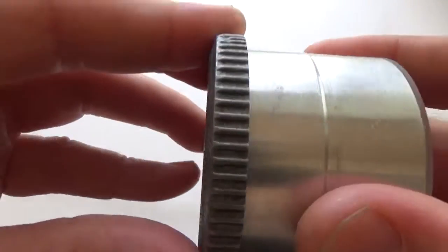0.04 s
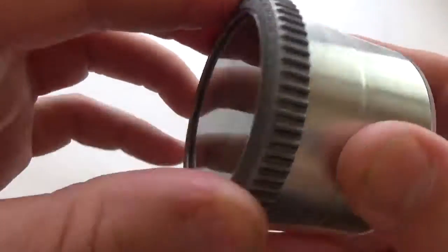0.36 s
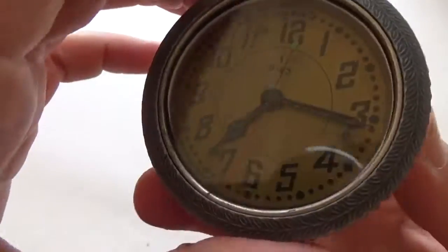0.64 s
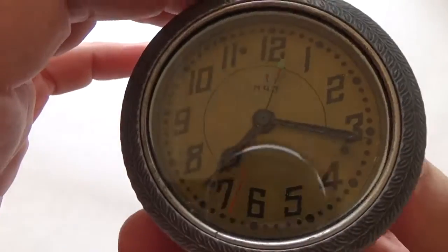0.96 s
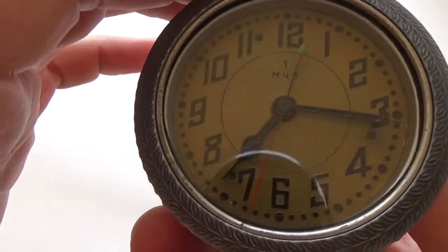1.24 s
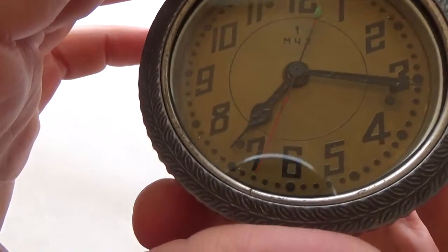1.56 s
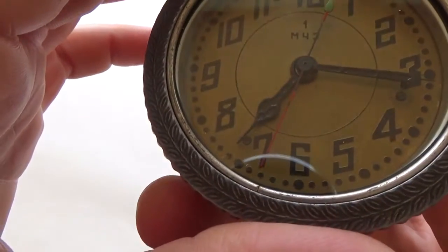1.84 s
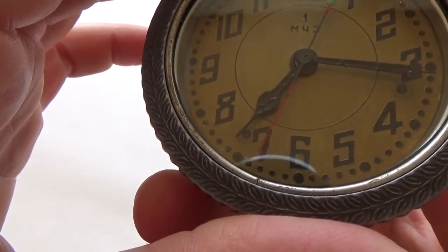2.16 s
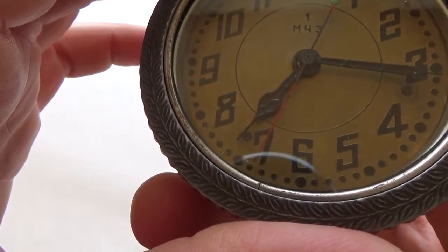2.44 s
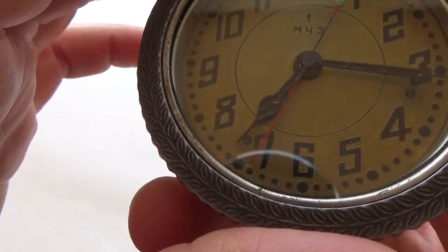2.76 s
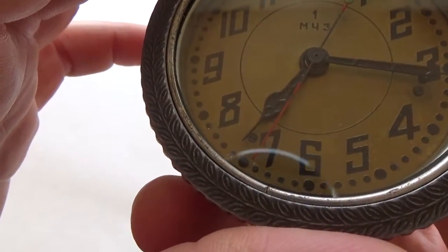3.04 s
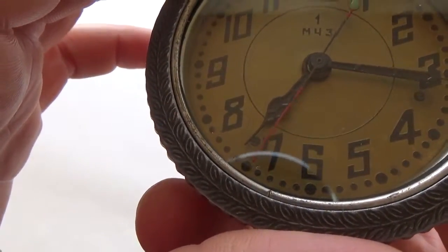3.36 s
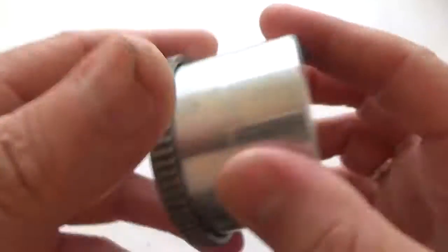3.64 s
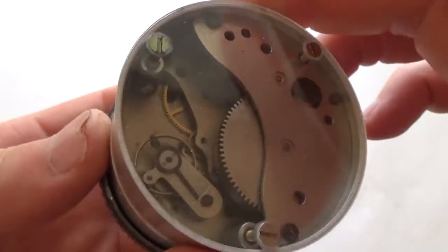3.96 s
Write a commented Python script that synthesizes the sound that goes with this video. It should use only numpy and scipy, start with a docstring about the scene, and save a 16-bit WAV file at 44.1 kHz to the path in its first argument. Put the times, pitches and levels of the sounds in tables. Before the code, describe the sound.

Quick metallic ticking of a handheld clock, with an opening snap and faint handling clicks.

```python
"""A small mechanical desk clock, turned in the hands close to the microphone in a quiet room.
Over a low hum and room noise, a loud double snap comes first and rings in the room. Then the escapement
beats five times a second, tick and tock, each beat three contacts that ring the metal case. Fingers rub
and click on the case, and a very faint high flutter joins at about one second. Past halfway the hum
drops away; near the end a loose part clinks as the clock is turned over."""
import sys
import numpy as np
from scipy import signal
from scipy.fft import rfft, irfft, next_fast_len
from scipy.io import wavfile
from scipy.ndimage import map_coordinates

SR = 44100
rng = np.random.default_rng(int(sys.argv[2]) if len(sys.argv) > 2 else 0)


def output_pcm(signal):
    """Save a mono or channel-first signal as 16-bit PCM at the path in sys.argv[1].

    Samples are clipped to [-1, 1] before scaling.
    """
    pcm = np.clip(np.atleast_2d(signal).T, -1, 1) * 32767
    wavfile.write(sys.argv[1], SR, np.round(pcm).astype(np.int16))


N = 176400


def amp(db):
    """Decibels to gain."""
    return 10 ** (np.asarray(db) / 20)


def unit(x):
    """Scale to rms 1."""
    return x / np.sqrt(np.mean(x ** 2) + 1e-20)


def fade(t, t60):
    """Exponential decay, 60 dB down after t60 seconds."""
    return np.exp(-np.log(1000) * t / t60)


def along(points, hz):
    """Read (Hz, value) points on a log frequency axis."""
    freqs, values = np.transpose(points)
    return np.interp(np.log(hz + 1), np.log(freqs + 1), values)


def level(points):
    """Turn (seconds, dB) points into a gain per sample."""
    return amp(np.interp(np.arange(N) / SR, *np.transpose(points)))


def wobble(rate):
    """A smooth random curve, rate knots a second."""
    knots = rng.standard_normal(int(N * rate / SR) + 4)
    return map_coordinates(knots, [np.arange(N) * rate / SR])


def add(track, start, sound):
    """Mix a sound in at start seconds."""
    part = track[max(round(start * SR), 0):][:len(sound)]
    part += sound[:len(part)]


def colour(x, spectrum):
    """Filter by (Hz, dB) points."""
    n = x.shape[-1]
    return irfft(rfft(x) * amp(along(spectrum, np.fft.rfftfreq(n, 1 / SR))), n)


def spread(pair, width):
    """Two unrelated signals, as mid and side, make left and right."""
    side = colour(pair[1], width)
    return np.array([pair[0] + side, pair[0] - side])


def noise(spectrum, width):
    """Coloured stereo noise of rms 1."""
    return unit(spread(colour(rng.standard_normal((2, N)), spectrum), width))


def burst(spectrum, t60, low_cut_hz=140):
    """A coloured crack without deep bass that starts near rms 1 and dies away."""
    envelope = fade(np.arange(SR // 10) / SR, t60)
    crack = envelope * colour(rng.standard_normal(len(envelope)), spectrum)
    low_cut = signal.butter(2, low_cut_hz, "high", fs=SR, output="sos")
    return unit(signal.sosfilt(low_cut, crack)) * np.sqrt(np.mean(envelope ** 2))


def ring(hz, db, t60, size=SR // 10, scatter_db=2):
    """Struck modes that start near rms 1, their balance a little different at every blow."""
    t = np.arange(size) / SR
    gain = amp(db + scatter_db * rng.standard_normal(len(hz)))
    phase = rng.random((len(hz), 1))
    waves = np.sin(2 * np.pi * (hz[:, None] * t + phase)) * fade(t, t60[:, None])
    return gain / np.linalg.norm(gain) @ waves * np.sqrt(2)


# The room's hum, rumble and hiss. Each row: frequency in Hz, relative level in dB.
HUM_PARTIALS = [(59.3, -1.5), (89, -17.5), (118.6, -14), (178, -13.5), (268, -12), (473, -17)]
RUMBLE_SPECTRUM = [(20, -15), (35, -13.5), (55, -4), (80, -9), (135, 3), (180, 0), (220, -9.5), (275, 0),
                   (340, -11.5), (450, -16), (800, -47.5)]
HISS_SPECTRUM = [(180, -31), (300, -4), (656, -11), (961, -9), (1100, -14), (1340, -10), (2250, -18),
                 (3240, -16), (4370, -22), (12900, -25.5), (16000, -29)]
# How each rises and falls at the microphone. Each row: time in seconds, level in dB.
HUM_LEVEL = [(0, -69), (.3, -73.5), (.45, -64.5), (.68, -69), (.85, -82), (1.0, -65.5), (1.7, -70),
             (2.4, -71.5), (2.53, -80.5), (4, -86)]
RUMBLE_LEVEL = [(0, -72.5), (2.3, -73.5), (2.8, -73.5), (3.25, -76), (3.45, -69.5), (3.65, -76),
                (3.83, -69), (4, -73.5)]
HISS_LEVEL = [(0, -72.5), (.8, -72), (1.1, -72.5), (2.4, -73), (2.7, -74), (4, -73.5)]
# Stereo width of rumble and hiss. Each row: frequency in Hz, side over mid in dB.
ROOM_TONE_WIDTH = [(60, -21.5), (150, -19.5), (400, -6.5), (950, -0.5), (2400, 0), (6000, -6),
                   (12000, -13.5)]


def room_tone(hum_drift_s=0.00055, rumble_waver_db=1.47):
    """The quiet room behind the clock: a wavering low hum that drops away, over rumble and hiss."""
    t = np.arange(N) / SR
    hum = np.zeros(N)
    for hz, db in HUM_PARTIALS:
        hum += amp(db) * np.sqrt(2) * np.sin(2 * np.pi * hz * (t + hum_drift_s * wobble(rate=4)))
    waver = amp(rumble_waver_db * wobble(rate=6.2))
    rumble = level(RUMBLE_LEVEL) * waver * noise(RUMBLE_SPECTRUM, ROOM_TONE_WIDTH)
    hiss = level(HISS_LEVEL) * noise(HISS_SPECTRUM, ROOM_TONE_WIDTH)
    return level(HUM_LEVEL) * hum + rumble + hiss


# The pips of one flutter cycle. Each row: delay in seconds, pitch in Hz, level in dB.
FLUTTER_PIPS = [(.007, 3280, -72.5), (.006, 2680, -72), (.030, 1400, -110.5)]


def flutter(span_s=(.92, 3.96), period_s=.04, detune=0.037, scatter_db=0.5):
    """Very faint high pips in a fast, even cycle, centred behind the clock."""
    out, t = np.zeros(N), np.arange(SR // 10) / SR
    for start in np.arange(*span_s, period_s):
        for delay, hz, db in FLUTTER_PIPS:
            pitch = hz * (1 + detune * rng.standard_normal())
            gain = amp(db + scatter_db * rng.standard_normal())
            add(out, start + delay, gain * np.sin(2 * np.pi * pitch * t) * fade(t, t60=0.035))
    return out


# Sound scattered into the room. Each row: frequency in Hz, gain in dB.
SCATTER_SPECTRUM = [(500, -17), (3000, -7), (4800, -5.5), (6500, 4), (8000, 5.5), (9500, 4.5), (11000, 1),
                    (13000, -10.5), (16000, -15.5)]
# How long the room rings. Each row: frequency in Hz, t60 in seconds.
ROOM_DECAY = [(200, 0.22), (3000, 0.304), (8500, 0.24), (12000, .2), (16000, 0.07)]
# Stereo width of echoes, rubbing and the swell. Each row: frequency in Hz, side over mid in dB.
DIFFUSE_WIDTH = [(60, -24), (150, -20.5), (400, -7.5), (1000, -9), (2400, -6.5), (6000, -7.5),
                 (12000, -17.5)]


def room_reverb(clock, positions=20):
    """The room returns the clock's clicks as a diffuse tail that changes as the clock moves."""
    out = np.zeros((2, N))
    # Multiplying by noise keeps the clicks' timing and smears away their pitch.
    scattered = colour(clock * rng.standard_normal(N), SCATTER_SPECTRUM)
    for piece in np.array_split(np.arange(N), positions):
        hz, t, bands = signal.stft(rng.standard_normal((2, SR // 2)), SR, nperseg=256)
        _, tails = signal.istft(bands * fade(t, along(ROOM_DECAY, hz)[:, None]), SR)
        for channel, response in zip(out, spread(tails, DIFFUSE_WIDTH)):
            echo = signal.fftconvolve(scattered[piece], response / np.linalg.norm(response))
            add(channel, piece[0] / SR, echo)
    return out


# Skin sliding on the case. Each row: time in seconds, level in dB.
RUB_LEVEL = [(0, -76.5), (.3, -80), (.38, -83), (.44, -86), (.462, -67), (.48, -80), (.51, -71),
             (.6, -75.5), (.7, -77.5), (.76, -84), (3.4, -84.5), (3.5, -78.5), (3.7, -78.5), (3.76, -77),
             (4, -82)]
# The colour of that friction. Each row: frequency in Hz, relative level in dB.
RUB_SPECTRUM = [(300, -8), (1200, -4.5), (4000, -3.5), (9000, -0.5), (12000, -7), (16000, -18.5)]


def finger_rub():
    """Skin rubs on metal close to the microphone: a soft hiss that swells and sinks."""
    return level(RUB_LEVEL) * noise(RUB_SPECTRUM, DIFFUSE_WIDTH)


# Touches on the case. Each row: start in seconds, then levels of click, thud and rim ring in dB.
TOUCHES = [(.4895, -51, -60, -61.5), (3.8575, -75, -59.5, -55), (3.9130, -68, -57.5, -84)]
# Bright click and low thud of a touch or a snap. Each row: frequency in Hz, relative level in dB.
CLICK_SPECTRUM = [(1000, -26), (4500, -16), (6500, -8.5), (8700, 5), (10500, -5), (12500, -13.5),
                  (16000, -29.5)]
THUD_SPECTRUM = [(30, -20), (90, -7.5), (150, -5.5), (230, 1.5), (310, -5), (400, -1), (550, 0), (680, -11),
                 (800, -4), (1000, -7), (1250, 1), (1550, -8), (2300, -11), (3400, -5.5), (4500, -18),
                 (9000, -29)]
# Modes of the rim. Each row: frequency in Hz, relative level in dB, t60 in seconds.
RIM_MODES = [(1210, 1.5, 0.066), (3200, 0.5, 0.016), (4450, 8.5, .022), (7251, -18, .05)]


def finger_clicks(t60=0.01):
    """Fingers knock lightly on the case and ring its rim as the grip changes."""
    out = np.zeros(N)
    for start, click_db, thud_db, rim_db in TOUCHES:
        click = amp(click_db) * burst(CLICK_SPECTRUM, t60)
        thud = amp(thud_db) * burst(THUD_SPECTRUM, t60)
        rim = amp(rim_db) * ring(*np.transpose(RIM_MODES))
        add(out, start, click + thud + rim)
    return out


# Clinks of a loose metal part. Each row: start in seconds, level in dB.
CLINKS = [(3.7324, -42), (3.7388, -48.5), (3.7427, -53), (3.7452, -54), (3.9850, -56.5)]
# Its modes. Each row: frequency in Hz, relative level in dB, t60 in seconds.
LOOSE_PART_MODES = [(2800, -9.5, 0.019), (4050, -14.5, 0.025), (8170, -2, 0.012), (9200, -4, 0.01),
                    (10160, -1, 0.0085), (11100, -1, 0.0065), (12600, -4.5, 0.0066)]
# Its rough contact. Each row: frequency in Hz, relative level in dB.
GRATE_SPECTRUM = [(500, -11.5), (2700, 3), (6000, -8), (10000, 0.5), (16000, -18)]


def rattle(grate_db=-16):
    """A loose part rings and grates as the clock is turned over at the microphone."""
    out = np.zeros(N)
    for start, db in CLINKS:
        clink = ring(*np.transpose(LOOSE_PART_MODES))
        grate = amp(grate_db) * burst(GRATE_SPECTRUM, t60=0.015)
        add(out, start, amp(db) * (clink + grate))
    return out


# Blows of the opening snap. Each row: start in seconds, click level in dB, thud level in dB.
SNAP_BLOWS = [(0.0398, -14.5, -20), (0.0443, -8.5, -25.5), (0.0453, -20.5, -17), (0.049, -30.5, -22.5)]
# The hollow ring under them. Each row: frequency in Hz, relative level in dB, t60 in seconds.
HOLLOW_MODES = [(131, -16, 0.53), (208, -8.5, .25), (255, -3.5, .29), (402, -7, .27), (471, -5, 0.12),
                (538, -2.5, .22), (567, -3.5, .27), (790, -0.5, .24), (907, -6, .21), (987, -11.5, .28),
                (1188, -3, .21), (1204, -3, .2), (1647, -8.5, 0.35), (2256, -12, .22), (3556, -7.5, 0.08)]
# Colour of the swell and of the room's answer. Each row: frequency in Hz, relative level in dB.
SWELL_ECHO_SPECTRUM = [(30, -31.5), (130, -10), (260, -10), (560, -5), (670, -21), (800, -10.5),
                       (1200, -10.5), (1500, -15.5), (2000, -14.5), (3300, -12), (4800, -19), (7000, -13.5),
                       (9450, -11.5), (12000, -24), (14500, -34), (16000, -54.5)]


def snap(side_db=-13.5, pan_db=0.1, hollow_db=-31):
    """A brief rising hiss swells into a cluster of hard blows; a hollow ring and the room carry on."""
    swell_db, rise_db_per_s = -34.5, 1098.5
    echo_db, hold_s, sag_db_per_s = -34, .045, 68
    mid, side = np.zeros((2, N))
    for start, click_db, thud_db in SNAP_BLOWS:
        for track, db in ((mid, 0), (side, side_db)):
            click = amp(db + click_db) * burst(CLICK_SPECTRUM, t60=.007)
            thud = amp(db + thud_db) * burst(THUD_SPECTRUM, t60=.012)
            add(track, start, click + thud)
    onset = SNAP_BLOWS[0][0]
    add(mid, onset, amp(hollow_db) * ring(*np.transpose(HOLLOW_MODES), size=SR // 2))
    direct = np.array([mid + side, mid - side]) * amp([[pan_db], [-pan_db]])
    age = np.arange(N) / SR - onset
    swell = (age < 0) * amp(swell_db - rise_db_per_s * np.abs(age))
    # The echo holds almost level for a moment, then dies away.
    echo = (age >= 0) * amp(echo_db - sag_db_per_s * np.clip(age, 0, hold_s))
    echo *= fade(np.maximum(age - hold_s, 0), t60=0.28)
    return direct + (swell + echo) * noise(SWELL_ECHO_SPECTRUM, DIFFUSE_WIDTH)


# Ticks and tocks in turn. Each row: start in seconds, relative level in dB, lift of the high ring in dB.
BEATS = [(.2349, -39, 11), (.4297, -45.5, 15.5), (.6313, -42, 25.5), (.8279, -44.5, 5.5), (1.0318, -42, 4),
         (1.2292, -43, -0.5), (1.4319, -41, -0.5), (1.6283, -41.5, -4), (1.8311, -40.5, 0),
         (2.0277, -42, -6.5), (2.2302, -40, -3), (2.4261, -42, -1), (2.6295, -40, -4.5),
         (2.8250, -41, -1.5), (3.0285, -41, -0.5), (3.2240, -43.5, -0.5), (3.4269, -38.5, -1.5),
         (3.6236, -45, -5.5), (3.8250, -35.5, 8)]
# The contacts of one beat: unlocking, impulse, drop. Each row: lead on a tick and on a tock in seconds,
# relative level in dB, further lift of the high ring in dB.
CONTACTS = [(0.033, 0.022, -21.5, 5), (.0147, .0132, -18.5, -7), (0, 0.00067, 0, 0)]
# Modes of the metal case. Each row: frequency in Hz, relative level on a tick and on a tock in dB,
# t60 in seconds.
CASE_MODES = [(3062, -23.5, -24.5, 0.062), (3414, -21.5, -24, 0.049), (4300, -15.5, -25.5, .021),
              (4782, -13.5, -20, .02), (5677, -22, -21, 0.0093), (6380, 0, 0.5, 0.0065),
              (6833, 4.5, -5.5, 0.0099), (7650, 0.5, 5.5, 0.0056), (8010, 3.5, 2, 0.012),
              (8840, -8.5, -11.5, 0.012), (9070, -6, -28, .014), (10470, -11, -27, 0.014),
              (10990, -10, -16, 0.015), (12900, -11.5, -5, 0.0083)]
# The dry crack of a contact. Each row: frequency in Hz, relative level in dB.
CRACK_SPECTRUM = [(1500, -29), (2800, -19), (4300, -8), (7500, 0), (10500, -5.5), (13300, -8.5),
                  (15000, -27), (16000, -25.5)]


def escapement(gain_db=1, crack_db=-2, attack_s=0.00063, detune=0.007):
    """Close up, a beat is two light contacts and a hard drop; the two pallets ring the case differently."""
    high_ring_hz, high_width_hz = 10670, 950
    out, t = np.zeros(N), np.arange(SR // 10) / SR
    hz, tick_db, tock_db, t60 = np.transpose(CASE_MODES)
    high_ring = np.exp(-((hz - high_ring_hz) / high_width_hz) ** 2)
    attack = 1 - np.exp(-t / attack_s)
    for beat, (start, beat_db, lift_db) in enumerate(BEATS):
        pallet = beat % 2
        modes_db = (tick_db, tock_db)[pallet] + lift_db * high_ring
        for *leads, contact_db, contact_lift_db in CONTACTS:
            pitches = hz * (1 + detune * rng.standard_normal(len(hz)))
            case = ring(pitches, modes_db + contact_lift_db * high_ring, t60)
            crack = amp(crack_db) * burst(CRACK_SPECTRUM, t60=.011)
            gain = amp(gain_db + beat_db + contact_db)
            add(out, start - leads[pallet], gain * (case + crack) * attack)
    return out


def scene(pan_db=1.26, reverb_db=-12):
    """The clock close to the microphone and a little left, with the snap and the quiet room around it."""
    clock = escapement() + finger_clicks() + rattle()
    near = clock * amp([[pan_db], [-pan_db]]) + finger_rub()
    return near + amp(reverb_db) * room_reverb(clock) + snap() + flutter() + room_tone()


def record(dry, top_hz=16200):
    """The recorder keeps nothing above its band limit."""
    size = next_fast_len(N + SR // 2)
    passband = np.fft.rfftfreq(size, 1 / SR) < top_hz
    return irfft(rfft(dry, size) * passband, size)[:, :N]


dry = scene()
out = record(dry)
output_pcm(out)
```